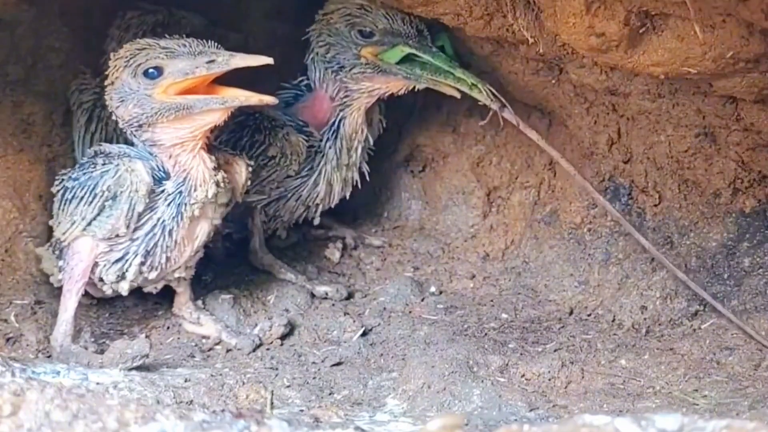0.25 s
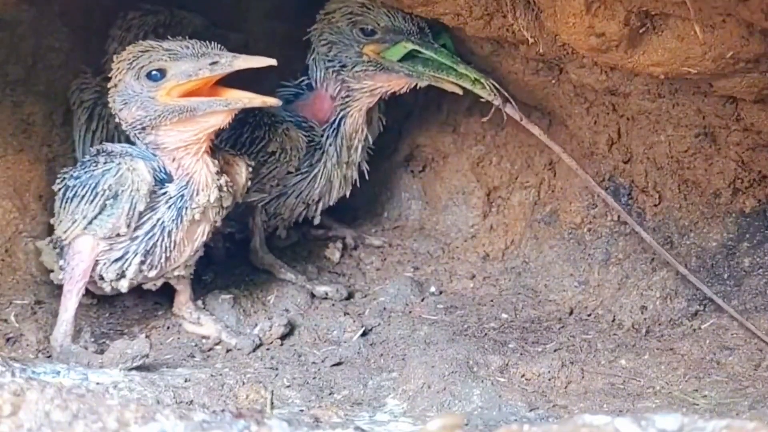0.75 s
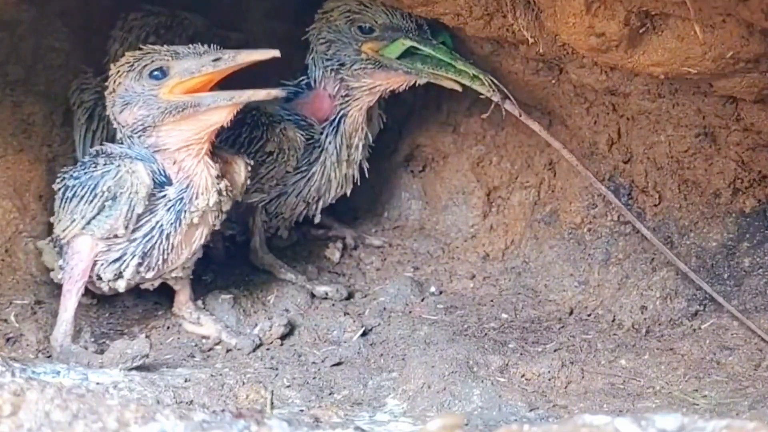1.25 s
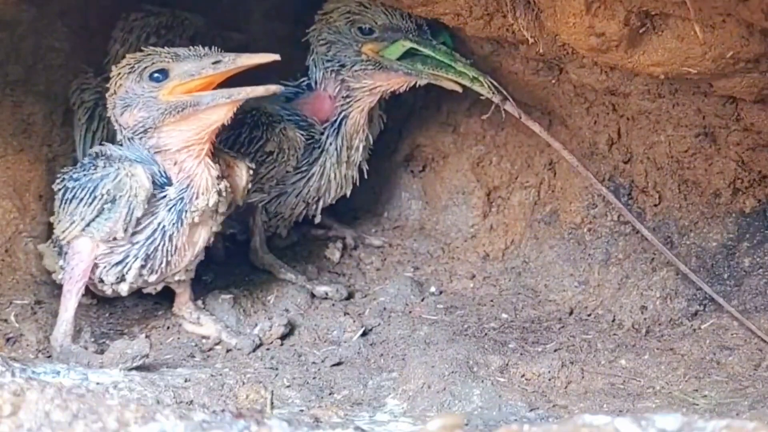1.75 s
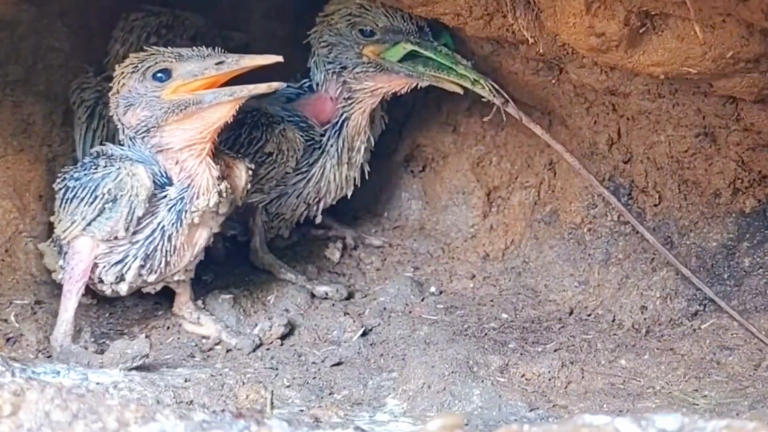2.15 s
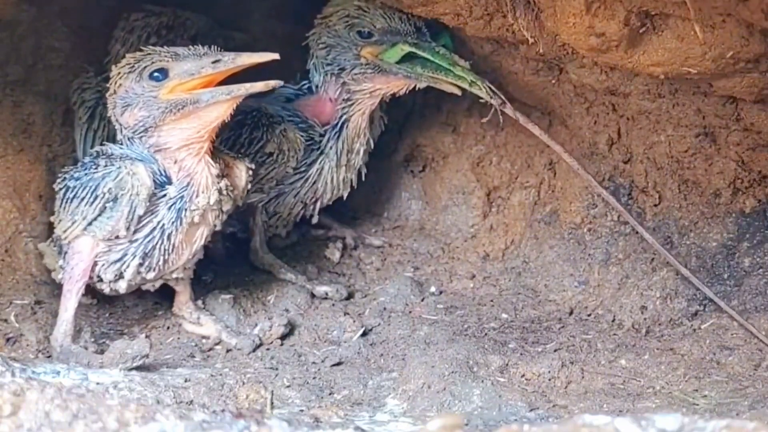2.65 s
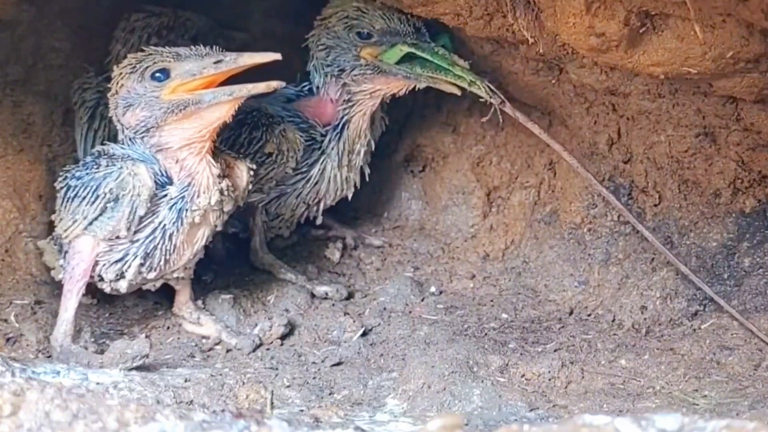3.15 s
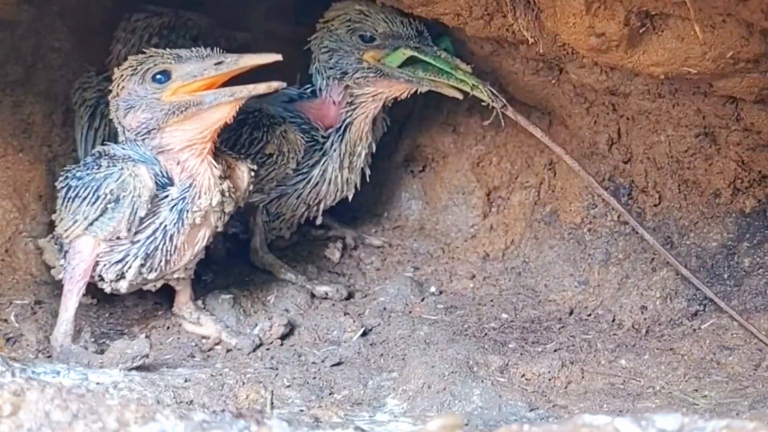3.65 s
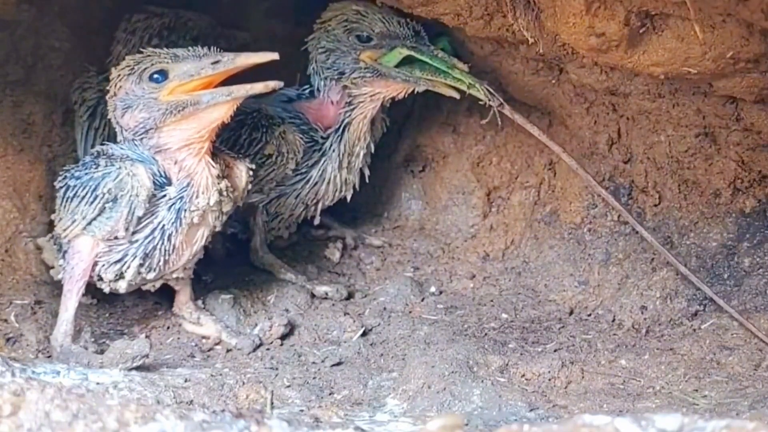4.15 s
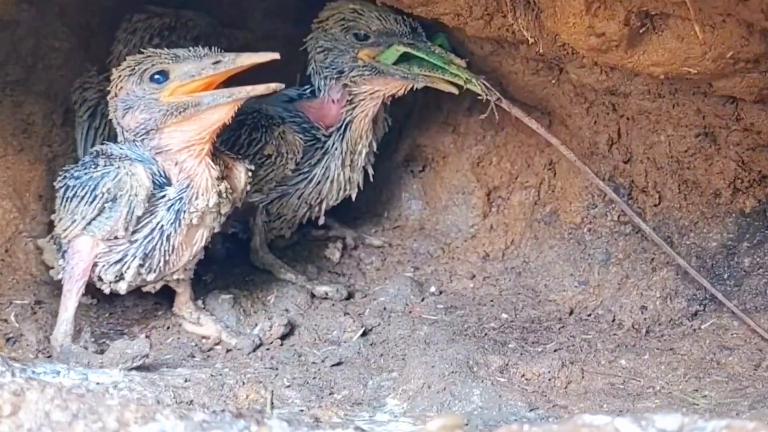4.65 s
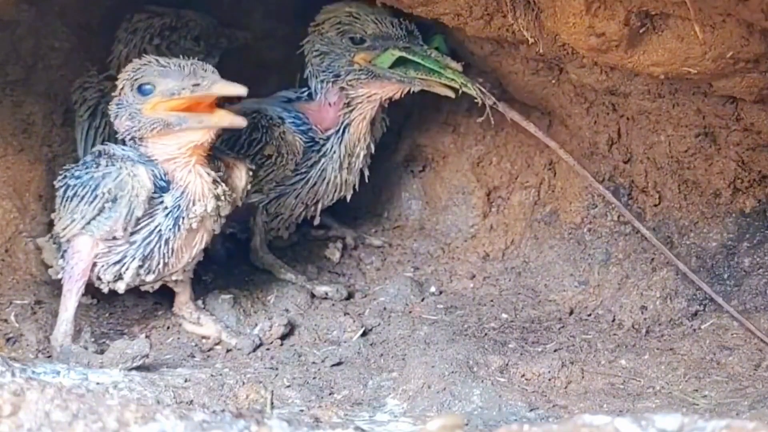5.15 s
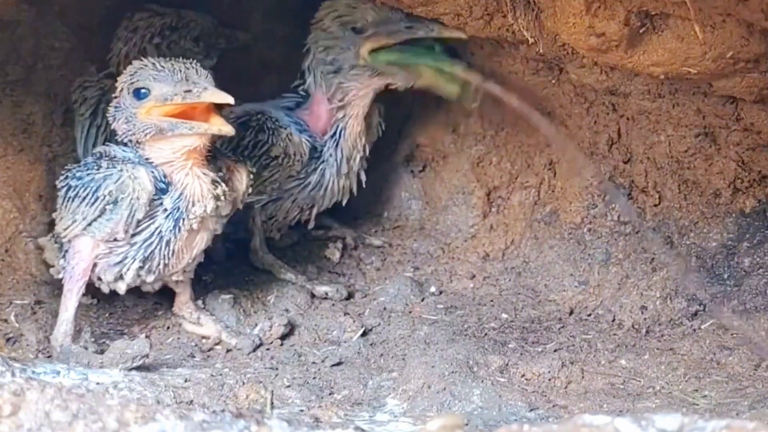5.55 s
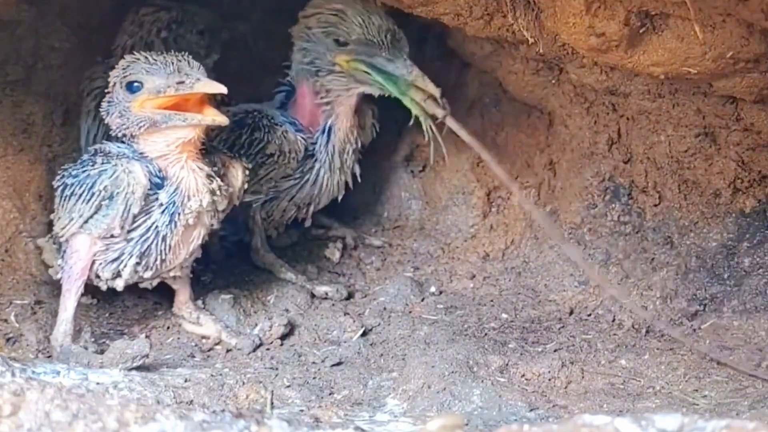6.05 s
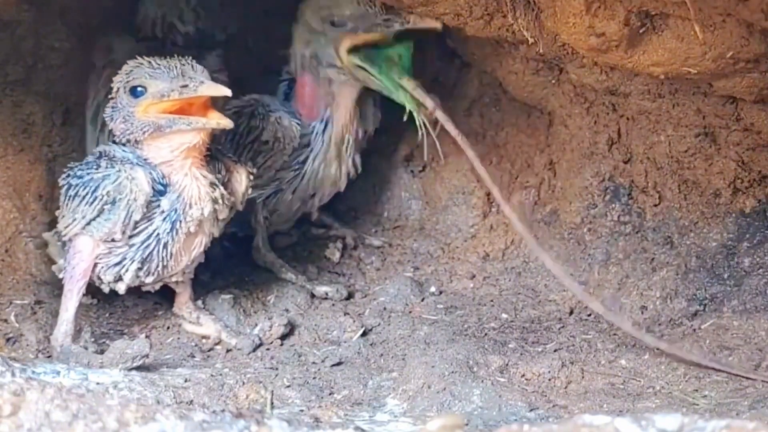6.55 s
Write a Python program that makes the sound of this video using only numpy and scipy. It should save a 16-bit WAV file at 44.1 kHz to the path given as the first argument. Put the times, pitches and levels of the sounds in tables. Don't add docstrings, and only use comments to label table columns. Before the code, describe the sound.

Close stereo pickup in a small earth burrow, with little echo. Low, soft rumble and a faint distant insect hiss run throughout, the rumble swelling briefly near 0.5 s and more weakly near 4.8 s. From the start one nestling begs about ten times a second: short hoarse whistles around 2.8 kHz, arching quickly up and down, rough and buzzing from two beating tones, wrapped in breathy hiss. A tiny wet snap and plop opens each call, and often another tick closes it. At 1.7-1.9 s the calls slur together, ending the first bout. The second, very regular, runs from 1.95 to 4.65 s and closes in a louder slurred run until 4.9 s. Then the head has turned: calls are a little weaker, with changed, brighter colour, until 6.5 s. A last joined run from 6.58 s rises at 6.7 s into a brief, climbing, airy rasp that collapses by 6.8 s.

```python
import sys
import numpy as np
from scipy import signal
from scipy.fft import rfft, irfft, next_fast_len
from scipy.io import wavfile
from scipy.ndimage import uniform_filter1d, minimum_filter1d

SR = 44100
rng = np.random.default_rng(int(sys.argv[2]) if len(sys.argv) > 2 else 0)


def invert_db(x):
    u = np.asarray(x, float) / 20
    return 10 ** u


def transcribe(u):
    v = np.clip(np.atleast_2d(u).T, -1, 1)
    q = np.round(v * 32767).astype(np.int16)
    wavfile.write(sys.argv[1], SR, q)


N = 300762
TIME = np.arange(N) / SR

# (frequency [Hz], density [dB per Hz])
RUMBLE_SPECTRUM = [(13, -41), (22, -22), (48, 3), (91, -9), (139, 6), (161, 1), (221, -14.5), (306, -12.5),
                   (400, -19.5), (520, -52.5), (880, -120)]
# (time [s], width [s], level [dB])
GUSTS = [
    (.47, 0.083, 7),
    (4.82, 0.075, 5),
]
RUMBLE_DB, SWELL_DB = -45.5, 0.5
# (frequency [Hz], density [dB per Hz])
OUTDOOR_SPECTRUM = [(250, -20), (450, -8), (900, -13), (1900, -13), (2800, -5), (3600, -10), (4350, -11),
                    (4800, 0), (5250, -9), (5800, -24), (9000, -27), (16000, -30)]
OUTDOORS_DB = -55.5

# (time [s], length [s], whistle level [dB], top pitch [Hz])
FIRST_BOUT = [(0.0206, 0.047, -15, 2825), (0.112, .044, -16.5, 2728), (0.2108, .047, -14.5, 2960),
              (0.3011, 0.047, -16.5, 2806), (0.391, 0.045, -14, 2863), (0.483, .042, -12, 2945),
              (0.5711, 0.044, -15.5, 2784), (0.6655, 0.048, -14.5, 2817), (0.7465, 0.043, -13, 2763),
              (0.821, 0.039, -12, 2750), (0.9184, 0.045, -13, 2850), (1.0112, .044, -14, 3033),
              (1.1034, 0.0409, -14.5, 2832), (1.1852, 0.044, -17, 2818), (1.2704, 0.044, -14, 2827),
              (1.368, .043, -14, 2822), (1.4631, 0.043, -15.5, 2796), (1.5464, 0.044, -15.5, 2881),
              (1.6307, 0.04, -16.5, 2760)]
STEADY_BOUT = [(1.942, 0.045, -15.5, 2880), (2.0376, 0.046, -16, 2745), (2.1355, 0.044, -14.5, 2769),
               (2.2319, 0.045, -14.5, 2731), (2.3257, .043, -13.5, 2735), (2.4118, .041, -14.5, 2737),
               (2.501, .043, -13.5, 2706), (2.599, 0.042, -12, 2747), (2.6914, 0.045, -14.5, 2827),
               (2.7863, 0.044, -15.5, 2802), (2.8831, 0.041, -13, 2720), (2.9817, 0.042, -15, 2750),
               (3.0813, .044, -14, 2765), (3.18, .046, -13.5, 2805), (3.281, 0.043, -13.5, 2720),
               (3.383, 0.044, -12.5, 2786), (3.4864, 0.043, -13, 2820), (3.5858, 0.045, -14, 2847),
               (3.6833, 0.044, -14, 2743), (3.7816, .046, -15.5, 2783), (3.8815, 0.044, -13.5, 2810),
               (3.9813, 0.044, -13.5, 2894), (4.081, .043, -11.5, 2830), (4.1679, 0.044, -16, 2787),
               (4.2623, 0.044, -14.5, 2753), (4.3526, 0.048, -15.5, 2880), (4.4501, .043, -15, 2880),
               (4.5508, 0.045, -13.5, 2758), (4.6444, 0.044, -15, 2760)]
TURNED_BOUT = [(4.9528, .044, -16.5, 2975), (5.053, 0.046, -15.5, 2962), (5.1482, 0.0438, -17, 2908),
               (5.223, 0.0446, -16, 2834), (5.309, .04, -15, 2808), (5.406, 0.0458, -16, 2864),
               (5.5052, 0.0464, -15, 2906), (5.604, 0.0451, -15, 2889), (5.6925, 0.0418, -17.5, 2784),
               (5.784, 0.0413, -17, 2800), (5.8755, 0.0462, -15.5, 2844), (5.9705, 0.0466, -17, 2873),
               (6.064, 0.043, -16, 2825), (6.1567, 0.0444, -16.5, 2745), (6.2507, 0.0437, -18.5, 2773),
               (6.3445, 0.0489, -17.5, 2843), (6.4387, 0.044, -16, 2873), (6.515, 0.0459, -17, 2805)]
# (end pitch [Hz], air level [dB], opening snap level [dB], plop level [dB], snap lead [s])
BOUT_VOICES = [
    (2631, -31.5, -20, -26, .0052),
    (2567, -32, -17, -25, .0051),
    (2660, -33.5, -22, -28.5, .0054),
]
BOUTS = list(zip((FIRST_BOUT, STEADY_BOUT, TURNED_BOUT), BOUT_VOICES))
# (time [s], whistle level [dB], pitch [Hz])
RUNS = [
    [(1.719, -14, 2523), (1.733, -9.5, 2857), (1.777, -19.5, 2562), (1.786, -13, 2605),
     (1.795, -14.5, 2650), (1.821, -12.5, 2527), (1.875, -13, 2768), (1.892, -36, 2887)],
    [(4.721, -13, 2684), (4.735, -6.5, 2845), (4.759, -15, 2697), (4.799, -10.5, 2773),
     (4.835, -17.5, 2610), (4.853, -7, 2958), (4.891, -19.5, 2580), (4.897, -27, 2587)],
    [(6.577, -13, 2753), (6.593, -8.5, 2922), (6.623, -20, 2650), (6.649, -11.5, 2790),
     (6.666, -17.5, 2950), (6.678, -9.5, 2810), (6.738, -22, 3043), (6.762, -22.5, 2890),
     (6.782, -45, 3000)],
]
RUN_AIR_DB, RUN_AIR_FOLLOWS = -34.5, 0.45
RUN_SNAP_DB, RUN_PLOP_DB, RUN_LEAD_S = -28, -29, 0.003
# (time [s], snap level [dB])
CLOSINGS = [(.0723, -24), (.264, -18), (0.724, -30), (.803, -19.5), (0.813, -23), (1.5132, -19),
            (1.593, -23), (1.891, -22), (2.3752, -23), (2.5555, -32), (2.6508, -24), (2.938, -24),
            (3.031, -19), (3.4393, -20), (3.543, -24), (3.6388, -23), (3.7389, -18), (3.8328, -18),
            (3.9376, -26), (4.035, -19), (4.2163, -23), (4.314, -24), (4.4061, -21.5), (4.607, -26),
            (5.3571, -25), (5.4613, -34), (5.7447, -22), (5.927, -27), (6.3004, -22), (6.488, -26)]
CLOSING_PLOP_DB = -32.5

# (share of length [1], whistle level [dB], air level [dB])
CALL_ARCH = [
    (0, -16, -18.5),
    (.07, 3.5, 0.4),
    (.3, 8, 2.9),
    (.75, 0.5, -0.7),
    (1, -3, -3.5),
    (1.25, -31, -17.5),
    (1.5, -54.5, -34.5),
]
PITCH_ARCH = [
    (0, -.6),
    (.07, 0),
    (.25, 1.15),
    (.42, 1.15),
    (.75, .25),
    (1, -.35),
    (1.5, -.6),
]
# (frequency [Hz], density [dB per Hz])
AIR_SPECTRUM = [
    (100, 0),
    (2200, 0),
    (2750, -3),
    (3300, 0),
    (20000, 0),
]
WAVER_HZ = 78

# (frequency [Hz], width [Hz], level with head sideways [dB], level with head turned [dB])
LEFT_PATH = [(325, 450, -29, -25.5), (536, 170, -34.5, -37.5), (904, 440, -15.5, -12),
             (1238, 276, -19.5, -16.5), (1615, 223, -10, -6.5), (1940, 680, -21.5, -20.5),
             (2888, 736, 3, 4), (3737, 180, -33.5, 2.5), (4544, 900, -9, -9), (5490, 506, -12, -5),
             (6440, 4140, -23, -20), (8040, 3100, -27.5, -31), (11920, 1600, -42.5, -26.5),
             (14100, 900, -32.5, -26.5), (15300, 700, -45.5, -27.5)]
RIGHT_PATH = [(317, 590, -29, -28.5), (586, 440, -30, -23.5), (1000, 400, -21, -21),
              (1324, 420, -24.5, -16.5), (1735, 222, -4, -4), (2423, 630, -1, 1.5), (2770, 560, 5, 4),
              (3450, 1150, -9.5, -4), (5120, 2840, -21, -17.5), (7020, 1970, -23.5, -20),
              (8860, 2470, -23.5, -25), (9950, 710, -26.5, -54), (11420, 730, -44, -23.5),
              (13900, 2000, -33.5, -23.5), (15300, 700, -47.5, -33)]
# (start [s], end [s])
HEAD_TURN = (4.46, 5.25)
WALLS_DB, WALLS_T60 = -23, 0.085

# (time [s], level [dB], resonance [Hz], hiss level under it [dB])
GASP = [
    (6.68, -41, 3180, -7),
    (6.716, -24, 3450, -13.5),
    (6.745, -22, 3800, -11.5),
    (6.77, -19, 4050, -18),
    (6.78, -38, 4100, -21),
    (6.8, -53, 4300, -9),
]
# (before head turn [dB], after it [dB])
TREBLE_MARGIN = [-49, -45]


def evened(x):
    return x / np.sqrt(np.mean(x ** 2) + 1e-20)


def wander(hz):
    return evened(signal.lfilter(*signal.butter(2, hz, fs=SR), rng.standard_normal(N)))


def hiss(spectrum, same):
    hz = np.fft.rfftfreq(N, 1 / SR)
    f, db = np.transpose(spectrum)
    shared, other = rng.standard_normal((2, N))
    pair = np.array([shared, same * shared + np.sqrt(1 - same ** 2) * other])
    gain = invert_db(np.interp(np.log(hz + 1), np.log(f + 1), db))
    return evened(irfft(rfft(pair) * gain, N))


def rumble():
    gusts_db = sum(db * np.exp(-((TIME - s) / width) ** 2) for s, width, db in GUSTS)
    return invert_db(RUMBLE_DB + gusts_db + SWELL_DB * wander(2)) * hiss(RUMBLE_SPECTRUM, 0.98)


def outdoors():
    return invert_db(OUTDOORS_DB) * hiss(OUTDOOR_SPECTRUM, 0.75)


def throat_moves():
    opens = []
    for calls, (_, _, snap_db, plop_db, lead) in BOUTS:
        opens += [(call[0] - lead, snap_db, plop_db) for call in calls]
    opens += [(run[0][0] - RUN_LEAD_S, RUN_SNAP_DB, RUN_PLOP_DB) for run in RUNS]
    spread = [0, 1.8, 2.2]  # s, dB, dB
    opens = np.array(opens) + rng.standard_normal((len(opens), 3)) * spread
    return [*opens, *((s, db, CLOSING_PLOP_DB) for s, db in CLOSINGS)]


def ticks():
    t = np.arange(400) / SR
    out, moves = np.zeros(N + 400), throat_moves()
    spray = signal.lfilter(*signal.butter(2, 4500, fs=SR), rng.standard_normal((len(moves), 400)))
    puff = (t / 0.0021) ** 2 * np.exp(2 - 2 * t / 0.0021)
    ring = np.sin(2 * np.pi * 2850 * t)
    rising = np.sin(2 * np.pi * (850 + 60000 * t) * t)
    for (s, snap_db, plop_db), noise in zip(moves, spray):
        snap = invert_db(snap_db - 5) * puff * (ring + 6.5 * noise)
        plop = invert_db(plop_db + 14) * puff * rising
        out[round((s - 0.002) * SR):][:400] += snap + plop
    return out[:N]


def effort():
    share, voice_db, breath_db = np.transpose(CALL_ARCH)
    lift = np.interp(share, *np.transpose(PITCH_ARCH))
    calls = []
    for rows, (end, air_db, *_) in BOUTS:
        for s, length, db, top in rows:
            times = s + share * length - 0.0015
            pitches = end + lift * (top - end)
            calls.append(np.transpose([times, db + voice_db, pitches, air_db + breath_db]))
    for rows in RUNS:
        calls.append(np.array([(s, db, hz, RUN_AIR_DB + RUN_AIR_FOLLOWS * (db + 14.5)) for s, db, hz in rows]))

    loud, pitch, air = np.zeros(N), np.full(N, 2700.0), np.zeros(N)
    for call in sorted(calls, key=lambda c: c[0, 0]):
        s, voice, hz, breath = call.T
        now = slice(round(s[0] * SR), round(s[-1] * SR))
        loud[now] = invert_db(np.interp(TIME[now], s, voice))
        air[now] = invert_db(np.interp(TIME[now], s, breath))
        pitch[now] = np.interp(TIME[now], s, hz)
    return uniform_filter1d(loud, size=30), pitch, uniform_filter1d(air, size=30)


def nestling():
    loud, pitch, air = effort()
    main = 2 * np.pi * np.cumsum(pitch + WAVER_HZ * wander(221.2)) / SR
    second = 2 * np.pi * np.cumsum(1.1 * pitch + 120 * wander(198.7)) / SR
    grip = 1 - np.clip(0.42 * wander(170) + 0.1, -0.3, 1)
    octave = invert_db(-10) * np.cos(2 * main)
    strain_db = np.clip(0.02 * (pitch - 2750), -6, 6)
    whistle = grip * (np.cos(main) + octave)
    whistle += invert_db(-4.5 + strain_db) * wander(130) * np.cos(second)
    return loud * np.sqrt(2) * whistle + invert_db(25.5) * air * hiss(AIR_SPECTRUM, 0.73)


def through(path, sideways, turned):
    size = next_fast_len(N + 4096)
    hz, out = np.fft.rfftfreq(size, 1 / SR), 0
    side, turn = rfft(sideways, size), rfft(turned, size)
    for k, (f, width, side_db, turn_db) in enumerate(path):
        mode = 1 / (1 + 1j * (hz ** 2 - f ** 2) / (hz + 1) / width) ** 2
        out = out + (-1) ** k * mode * (invert_db(side_db) * side + invert_db(turn_db) * turn)
    return irfft(out, size)[:N]


def burrow(x, t60):
    t = np.arange(4000) / SR
    tail = rng.standard_normal((2, 4000)) * invert_db(-60 * t / t60) * (t > 0.0004)
    tail /= np.linalg.norm(tail, axis=1, keepdims=True)
    return signal.fftconvolve(x, tail, axes=1)[:, :N]


def rasp():
    s, db, hz, hiss_db = np.transpose(GASP)
    angle = 2 * np.pi * np.cumsum(np.interp(TIME, s, hz)) / SR
    lower, upper = np.exp(1j * angle), np.exp(1j * angle * 1.2)
    air = rng.standard_normal((3, N))
    roar = evened((lower * signal.lfilter(*signal.butter(2, 270, fs=SR), air[0] / lower)).real)
    roar += invert_db(-5.5) * evened((upper * signal.lfilter(*signal.butter(2, 200, fs=SR), air[2] / upper)).real)
    roar += invert_db(-13) * evened(signal.lfilter(*signal.butter(1, [1400, 2200], "band", fs=SR), air[1]))
    bright = signal.lfilter(*signal.butter(2, [3000, 13500], "band", fs=SR), air[0] + 3.4 * air[1:])
    strength = invert_db(np.interp(TIME, s, db, -150, -150))
    return strength * (roar + invert_db(np.interp(TIME, s, hiss_db)) * bright)


def scene():
    outside = rumble() + outdoors()
    bird = ticks() + nestling()
    turned = np.interp(TIME, HEAD_TURN, [0, 1])
    paths = zip((LEFT_PATH, RIGHT_PATH), bird)
    near = np.array([through(path, own * (1 - turned), own * turned) for path, own in paths]) + rasp()
    treble = signal.lfilter(*signal.butter(4, 3500, "high", fs=SR), near)
    walls = invert_db(-5.5) * burrow(treble, 0.039) + invert_db(WALLS_DB) * burrow(near, WALLS_T60)
    return near + walls + outside


def gated_treble(x):
    band_hz, from_hz, edge_hz, luck_db = 345, 5900, 15750, 6.5
    hz, t, z = signal.stft(x, SR, nperseg=1024)
    band = (hz // band_hz).astype(int)
    power = [(abs(z[:, band == b]) ** 2).mean((0, 1)) + 1e-20 for b in range(band.max() + 1)]
    level_db = 10 * np.log10(power)
    luck = evened(uniform_filter1d(rng.standard_normal(level_db.shape), size=6))
    margin_db = np.interp(t, HEAD_TURN, TREBLE_MARGIN)
    over_db = level_db - level_db.max(0) - margin_db + luck_db * luck
    near_8k = np.exp(-((np.arange(len(luck)) * band_hz - 8000) / 1300) ** 2)
    over_db -= 8 * near_8k[:, None] * np.interp(t, HEAD_TURN, [0.5, 1])
    keep = np.where(hz[:, None] > from_hz, over_db[band] > 0, 1)
    edge = np.clip((edge_hz - hz[:, None]) / 150, 0, 1)
    return signal.istft(z * keep * edge, SR, nperseg=1024)[1][:, :N]


def limited(x):
    envelope = abs(signal.hilbert(x, next_fast_len(N))[:, :N]).max(0)
    excess_db = np.maximum(20 * np.log10(envelope + 1e-9) + 2.5, 0)
    hold_db = -minimum_filter1d(-excess_db, size=40)
    return x * invert_db(-0.75 * uniform_filter1d(hold_db, size=40))


def low_pass(x):
    return signal.sosfilt(signal.butter(12, 16450, fs=SR, output="sos"), x)


def record(dry):
    mix = gated_treble(limited(dry))
    return low_pass(mix)


dry = scene()
out = record(dry)
transcribe(out)
```